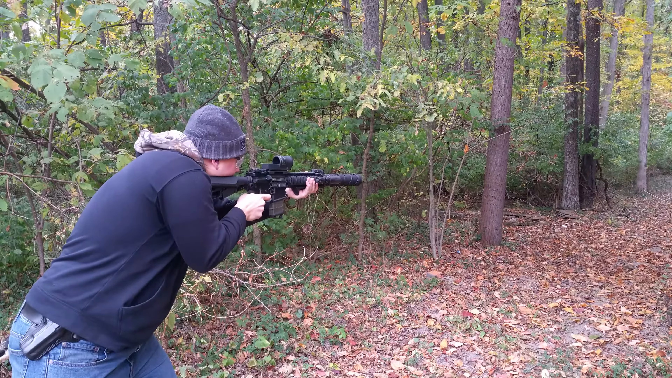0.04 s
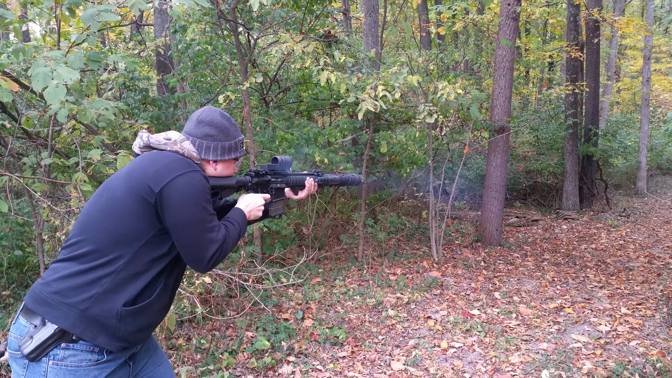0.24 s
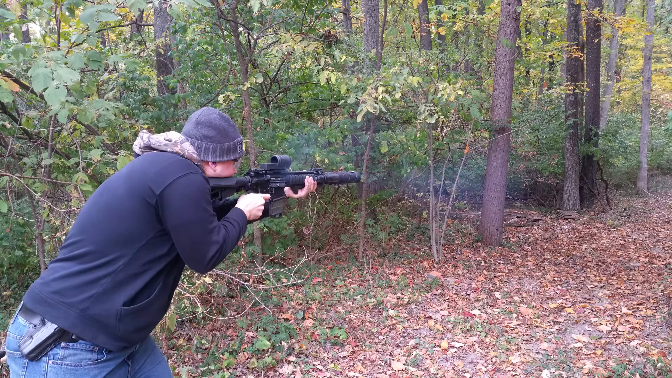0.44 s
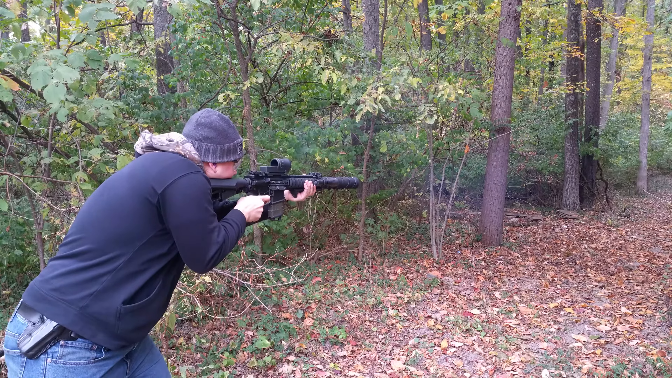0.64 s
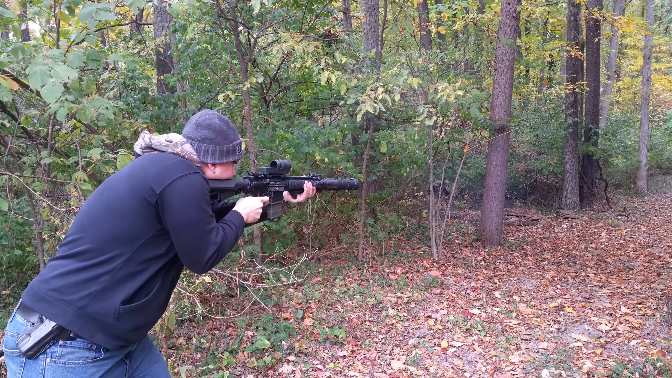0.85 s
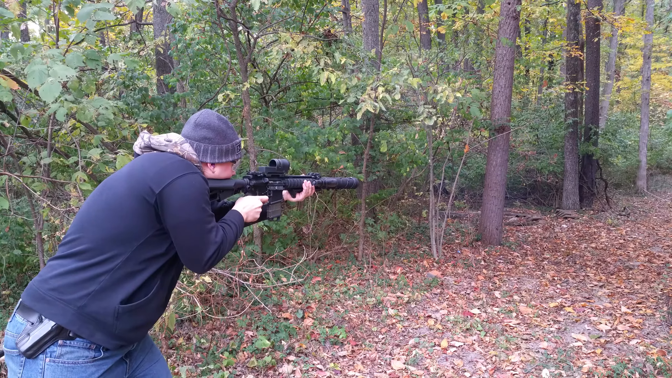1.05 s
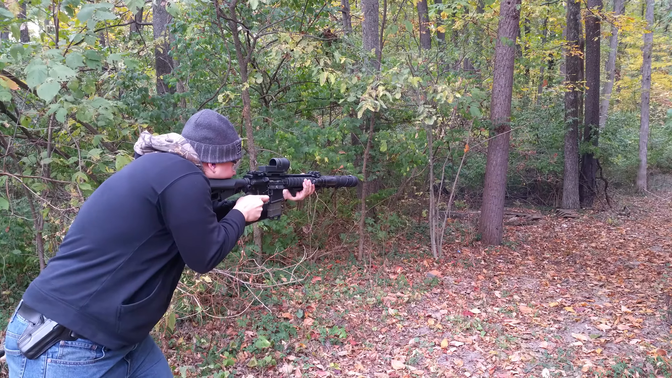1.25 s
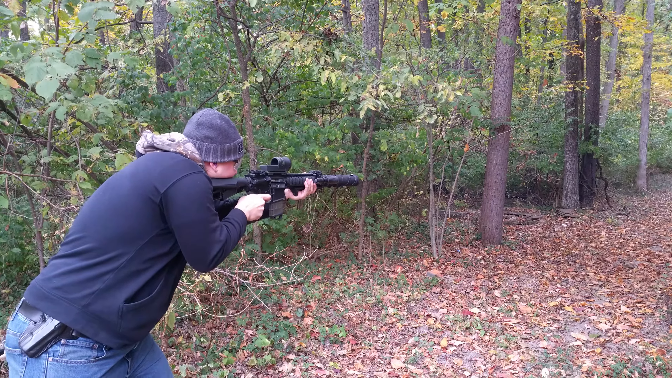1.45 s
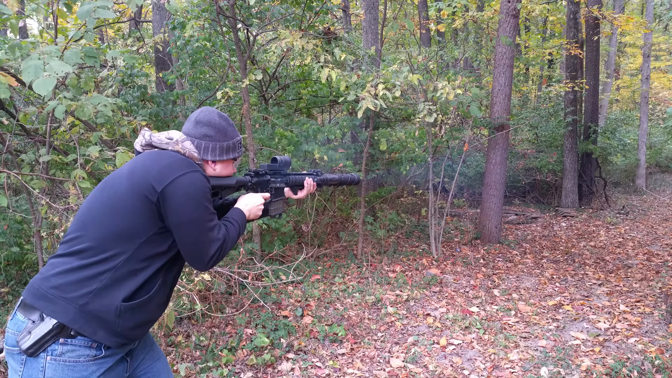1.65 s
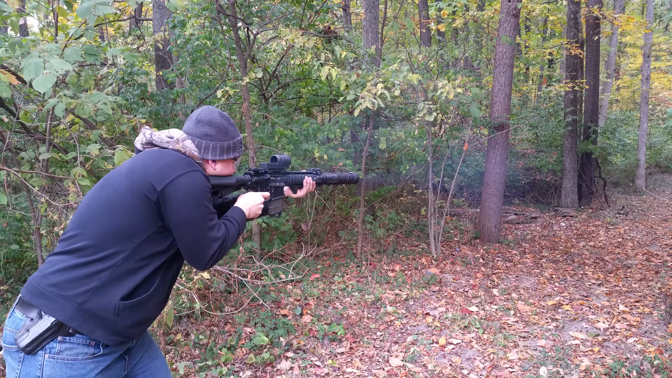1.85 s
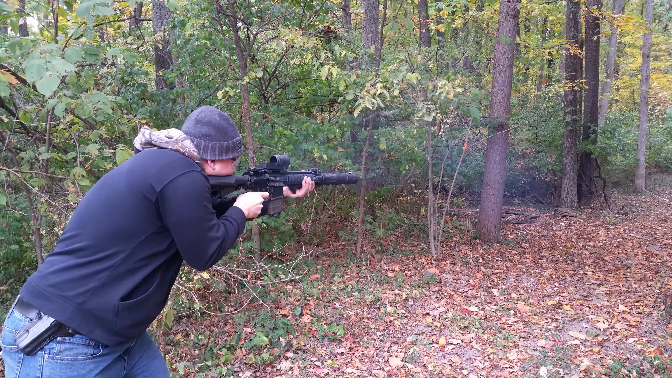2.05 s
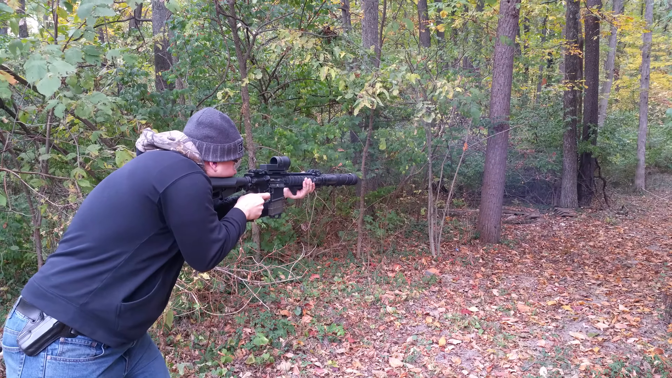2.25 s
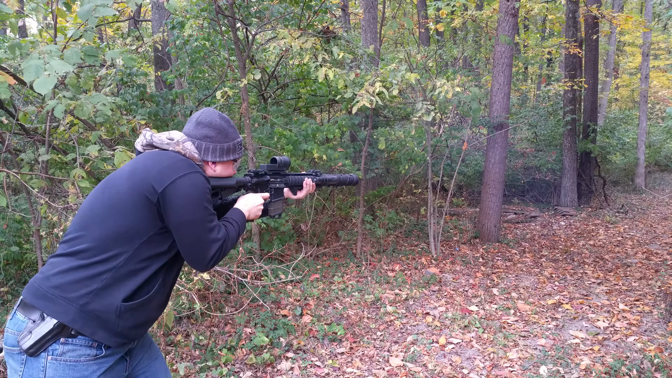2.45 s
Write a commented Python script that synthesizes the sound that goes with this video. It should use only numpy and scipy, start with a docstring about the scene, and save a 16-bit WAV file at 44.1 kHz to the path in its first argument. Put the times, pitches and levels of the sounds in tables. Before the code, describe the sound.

Silenced rifle gunfire outdoors: a quick pair, a gap of fading tree echoes and faint trigger clicks, then a quick string of three, loud and slightly distorted at a microphone a few metres away.

```python
"""Open woods, where a suppressed rifle a few metres away fires two shots, then three.
Each shot is a hammer click, a sharp noise report, a pressure pulse with a short gas blast, and a bolt thud.
Decaying random reflections return the bullet's crack from brush and trees; large trunks add slaps.
Clicks of trigger and action fall between the strings, over filtered-noise air and low microphone bumps.
A gain control ducks the level and holds it down; peaks clip."""
import sys
import numpy as np
from scipy import signal
from scipy.io import wavfile
from scipy.ndimage import uniform_filter1d

SR = 44100
rng = np.random.default_rng(int(sys.argv[2]) if len(sys.argv) > 2 else 0)


def waveform_to_disk(signal):
    """Save audio, clipped to [-1, 1], as 16-bit WAV at the path in sys.argv[1]."""
    frames = np.transpose(np.atleast_2d(signal))
    scaled = np.clip(frames, -1, 1) * 32767
    samples = np.round(scaled).astype(np.int16)
    wavfile.write(sys.argv[1], SR, samples)


N = 110250
T = np.arange(int(1.5 * SR)) / SR  # time within one event [s]

# Rifle shots, levels relative to each layer: t/s, crack level/dB, gas blast level/dB,
# low thump level/dB, woods echo level/dB
SHOTS = [(.2494, 0.5, -0.5, 5.5, -0.5), (0.4399, -2, -1.5, 4, -1), (1.5931, -0.5, -1.5, 4.5, -1.5),
         (1.7834, -0.5, -6, -12.5, -1.5), (1.9671, 0, -4.5, -6.5, -1)]
# Left microphone relative to right, for sounds close by: f/Hz, level/dB
LEFT_NEAR = [(100, -21.5), (1200, -2), (2600, -1.5), (3700, -3), (5000, -6), (5900, -14.5), (6900, -10.5),
             (8200, 3), (10000, 5.5), (15000, -2.5)]


def amp(db):
    """Amplitude ratio: 20 dB is a factor of ten."""
    return 10 ** (np.asarray(db) / 20)


def read(points, hz):
    """Interpolation along a logarithmic frequency axis."""
    f, value = np.transpose(points)
    return np.interp(np.log(hz + 1), np.log(f + 1), value)


def unit(x):
    """Normalization to a root-mean-square of 1."""
    return x / np.sqrt(np.mean(x ** 2) + 1e-20)


def add(mix, s, sound):
    """Superposition: adds a stereo sound to the mix from time s, cut at the end of the mix."""
    part = mix[:, max(round(s * SR), 0):][:, :sound.shape[1]]
    part += sound[:, :part.shape[1]]


def colour(x, spectrum, left):
    """Minimum-phase filtering: the Hilbert transform of log gain gives the phase of a causal filter."""
    hz = abs(np.fft.fftfreq(4096, 1 / SR))
    right_db = read(spectrum, hz)
    left_db = right_db + read(left, hz)
    log_gain = np.log(amp([left_db, right_db]))
    response = np.exp(np.conj(signal.hilbert(log_gain)))
    taps = np.fft.ifft(response).real[:, :len(hz) // 2]
    return signal.fftconvolve(x, taps, axes=1)[:, :x.shape[1]]


def noise():
    """White noise: equal mean power at all frequencies, independent at each microphone."""
    return rng.standard_normal((2, len(T)))


def flutter(depth_db, size):
    """Amplitude modulation by noise smoothed over size samples, common to both sides."""
    wander = unit(uniform_filter1d(rng.standard_normal(len(T)), size))
    return unit(amp(depth_db * wander))


def burst(length):
    """Impulsive noise: exponential decay with time constant length [s], equal energy on both sides."""
    x = noise() * np.exp(-T / length)
    energy_norm = np.linalg.norm(x, axis=1, keepdims=True)
    return x / energy_norm * np.sqrt(length * SR / 2)


def scatter(t60, grain_db):
    """Diffuse scattering: many uneven reflections, each band decaying 60 dB in its own time."""
    present = rng.random((2, len(T))) < .3
    reflections = unit(noise() * present * flutter(grain_db, size=24))
    hz, t, bands = signal.stft(reflections, SR, nperseg=256)
    decay = amp(-60 * t / read(t60, hz)[:, None])
    return signal.istft(bands * decay, SR, nperseg=256)[1][:, :len(T)]


def echoes(t60, grain_db):
    """Partial correlation: the trees stay put, so the echo patterns of the shots are partly alike."""
    same_paths = 0.56  # share of echo power that repeats from shot to shot
    common = np.sqrt(same_paths) * scatter(t60, grain_db)
    return [common + np.sqrt(1 - same_paths) * scatter(t60, grain_db) for _ in SHOTS]


def rumble():
    """Low-frequency wind noise: band-limited noise on the microphones, dying away."""
    # Wind level at the left microphone: t/s, level/dB
    wind_level = [(0, -47.5), (.22, -49), (.7, -47.5), (1.2, -47), (1.55, -53), (1.9, -61.5), (2.5, -68)]
    top_hz, right_db = 132, -5.5
    low = signal.butter(3, [30, top_hz], "band", fs=SR, output="sos")
    level = np.interp(np.arange(N) / SR, *np.transpose(wind_level))
    wind = unit(signal.sosfilt(low, rng.standard_normal((2, N))))
    return amp(level + np.array([[0], [right_db]])) * wind


def breeze():
    """Broadband air noise: filtered noise in the leaves, under slow random amplitude modulation."""
    # Spectrum of air in the leaves: f/Hz, level/dB
    air_spectrum = [(20, -17), (130, -5), (220, -8), (450, -8), (800, -8.5), (1400, -19), (2500, -18),
                    (4200, -14.5), (5500, -17.5), (7500, -35), (10000, -39.5), (16000, -40)]
    level_db, swell_db = -31, 4.5
    left = [(60, 5), (300, 3.5), (1500, -3), (4000, -5), (6000, -14), (9000, 1)]  # f/Hz, level/dB
    swell = amp(swell_db * unit(uniform_filter1d(rng.standard_normal(N), size=5000)))
    return amp(level_db) * colour(rng.standard_normal((2, N)) * swell, air_spectrum, left)


def bumps():
    """Air pressure on a microphone: each bump is a low sine wave in a Gaussian envelope."""
    # Bumps at the left microphone: t/s, level/dB, f/Hz
    air_bumps = [(.012, -27, 95), (.036, -30, 76), (0.145, -41, 85.4), (.169, -38.5, 215),
                 (0.867, -23.5, 94)]
    out = np.zeros((2, N))
    for s, db, hz in air_bumps:
        cycles = (np.arange(N) / SR - s) * hz
        pulse = np.sin(2 * np.pi * cycles) * np.exp(-(cycles / 0.72) ** 2)
        out += amp([[db], [db - 23]]) * pulse  # left, right
    return out


def woods():
    """Reverberation: the bullet's crack returns from ever farther trees as one long, darkening hiss."""
    # Spectrum of the returning crack: f/Hz, level/dB
    woods_spectrum = [(30, -50.5), (110, -35.5), (400, -28.5), (750, -20), (1400, -15.5), (2400, -11),
                      (3100, -6), (3950, 2), (5200, 1), (6100, -2.5), (7200, -13.5), (8200, -25),
                      (10500, -34.5), (15500, -38)]
    # Left microphone relative to right, for distant sound: f/Hz, level/dB
    left_far = [(60, -9.5), (250, 3), (1200, -3.5), (2400, -1.5), (3900, -11), (5000, -8), (5900, -19.5),
                (6900, -12.5), (8200, 1.5), (10500, 6.5), (15000, 1.5)]
    # Reverberation time among the trees: f/Hz, 60 dB decay time/s
    woods_t60 = [(100, 1.5), (600, 1.88), (1300, 1.52), (2400, 1.26), (3600, .95), (4800, 0.77),
                 (6000, 0.65), (9500, 0.6), (15000, .55)]
    level_db, rise_s, grain_db, patch_db = 16, 0.074, 2.5, 1
    out = np.zeros((2, N))
    swell = (1 - np.exp(-T / rise_s)) * flutter(patch_db, size=700)
    for (s, _, _, _, echo_db), tail in zip(SHOTS, echoes(woods_t60, grain_db)):
        add(out, s, amp(level_db + echo_db) * swell * tail)
    return colour(out, woods_spectrum, left_far)


def trunks():
    """Discrete reflection: a few large trunks give delayed slaps after every shot."""
    # Single trunks that throw the crack back: delay t/s, level/dB, left minus right level/dB
    trunk_paths = [(0.063, -1.5, -5), (0.1129, 0, -9), (0.14, -4.5, -1), (.161, -1, 5), (.286, -14.5, -14)]
    # Spectrum of a trunk's reflection: f/Hz, level/dB
    trunk_spectrum = [(300, -19), (2000, -2), (4500, 5.5), (6000, -1), (8500, -19.5), (15500, -20.5)]
    slap_s = .0009  # decay time constant
    out = np.zeros((2, N))
    for s, _, _, _, echo_db in SHOTS:
        for delay, db, pan_db in trunk_paths:
            side_db = np.array([[pan_db], [-pan_db]]) / 2
            add(out, s + delay, amp(echo_db + db + side_db) * burst(slap_s))
    return colour(out, trunk_spectrum, LEFT_NEAR)


def thuds():
    """Impact and reverberation: the bolt slams shut, and each blast rolls low through the woods."""
    # Spectrum of thud and roll: f/Hz, level/dB
    low_spectrum = [(25, -14), (75, 0.5), (150, 1), (350, -3.5), (600, -9.5), (1200, -25), (4000, -50)]
    roll_db, roll_t60, roll_rise_s = -11, 1.0, .04
    bolt_delay_s, bolt_db, bolt_s = .062, 12, .005
    out = np.zeros((2, N))
    rise = 1 - np.exp(-T / roll_rise_s)
    roll = rise * amp(roll_db - 60 * T / roll_t60) * flutter(3, size=900)
    bolt_side_db = np.array([[-16], [0]])  # left, right
    for s, _, _, thump_db, _ in SHOTS:
        add(out, s, amp(thump_db) * roll * noise())
        bolt = amp(bolt_db + thump_db / 2 + bolt_side_db) * burst(bolt_s)
        add(out, s + bolt_delay_s, bolt)
    return colour(out, low_spectrum, [(60, 2), (600, 1)])


def action():
    """Impact of steel: a snap and a weaker, longer ring, for each hammer fall, trigger or action click."""
    # Trigger and action clicks between the strings: t/s, level/dB
    clicks = [(1.1524, -30), (1.1705, -33), (1.2392, -19), (1.2428, -18), (1.3475, -44), (1.5575, -26.5)]
    # Spectrum of the steel parts: f/Hz, level/dB
    steel_spectrum = [(200, -26.5), (1400, -5.5), (2500, -3.5), (3600, 5.5), (4300, -1.5), (5200, 9.5),
                      (6500, -2), (8500, -21.5), (15500, -11)]
    hammer_lead_s, hammer_db = 0.0075, -11
    snap_s, ring_s, ring_db = 0.0011, .016, -19  # ring level relative to snap
    out = np.zeros((2, N))
    hammer_falls = [(row[0] - hammer_lead_s, hammer_db) for row in SHOTS]
    for s, db in list(clicks) + hammer_falls:
        add(out, s, amp(db) * (burst(snap_s) + amp(ring_db) * burst(ring_s)))
    return colour(out, steel_spectrum, LEFT_NEAR)


def blasts():
    """Muzzle blast: a pressure pulse with an undershoot, then turbulent gas and a low thump."""
    # Spectrum of the blast: f/Hz, level/dB
    blast_spectrum = [(25, -19.5), (70, -8), (140, -6), (300, 0.5), (700, -0.5), (1400, -4), (2400, -5.5),
                      (4000, -3), (7000, -13.5), (16000, -27.5)]
    muzzle_db, muzzle_s, gas_db = 11.5, 0.00049, 7
    hold_s, fall_s = np.array([[0.014], [.058]]), np.array([[0.022], [.011]])  # left, right
    thump_level_db, thump_hz, thump_rise_s = -8.5, 120, 0.023
    left = [(100, 1.5), (400, 0.5), (1200, -4.5), (4000, -3.5)]  # f/Hz, level/dB
    out = np.zeros((2, N))
    u = T / muzzle_s
    pulse = (1 - u) * np.exp(-u)
    rush = np.exp(-np.maximum(T - hold_s, 0) / fall_s)  # lasts longer on the right, the muzzle side
    low = signal.butter(2, [thump_hz / 1.6, thump_hz * 1.6], "band", fs=SR, output="sos")
    thump_rise = 1 - np.exp(-T / thump_rise_s)
    for s, _, blast_db, thump_db, _ in SHOTS:
        gas = amp(gas_db + blast_db) * noise() * flutter(2.6, size=100)
        thump = amp(thump_level_db + thump_db) * unit(signal.sosfilt(low, noise())) * thump_rise
        add(out, s, rush * (gas + thump) + amp(muzzle_db + blast_db) * pulse)
    return colour(out, blast_spectrum, left)


def cracks():
    """Impulse and early scattering: the sharp report and its spray off nearby leaves and brush."""
    # Spectrum of the report: f/Hz, level/dB
    crack_spectrum = [(60, -28), (300, -3.5), (1200, -2.5), (2500, -3.5), (3600, -2.5), (4900, -0.5),
                      (6000, -2), (7200, -12), (8500, -19), (11000, -15.5), (15500, -11.5)]
    # Decay of the brush reflections: f/Hz, 60 dB decay time/s
    brush_t60 = [(100, 0.25), (1200, 0.17), (4000, 0.39), (9000, 0.28), (15000, .25)]
    report_db, report_s = 12, 0.00091
    brush_db, grain_db = 12.5, 0.6
    out = np.zeros((2, N))
    for (s, db, _, _, _), spray in zip(SHOTS, echoes(brush_t60, grain_db)):
        report = amp(report_db) * burst(report_s)
        add(out, s, amp(db) * (report + amp(brush_db) * spray))
    return colour(out, crack_spectrum, LEFT_NEAR)


def scene():
    """Linear superposition of the air, the echoes and the rifle."""
    air = rumble() + breeze() + bumps()
    echo = woods() + trunks()
    rifle = thuds() + action() + blasts() + cracks()
    return air + echo + rifle


def record(dry):
    """Peak-hold gain reduction: loud power ducks the gain for good; peaks clip; then a low-pass filter."""
    duck_above_db, duck_max_db, edge_hz = -26.5, 11.5, 15900
    power = abs(uniform_filter1d((dry ** 2).mean(0), size=40))
    power_db = 10 * np.log10(power + 1e-12)
    wanted_db = np.clip(power_db - duck_above_db, 0, duck_max_db)
    duck_db = np.maximum.accumulate(wanted_db)  # never recovers
    clipped = np.clip(dry * amp(-uniform_filter1d(duck_db, size=60)), -1, 1)
    low_pass = signal.firwin(401, edge_hz, window=("kaiser", 8), fs=SR)
    return signal.oaconvolve(clipped, low_pass[None], "same")


dry = scene()
out = record(dry)
waveform_to_disk(out)
```